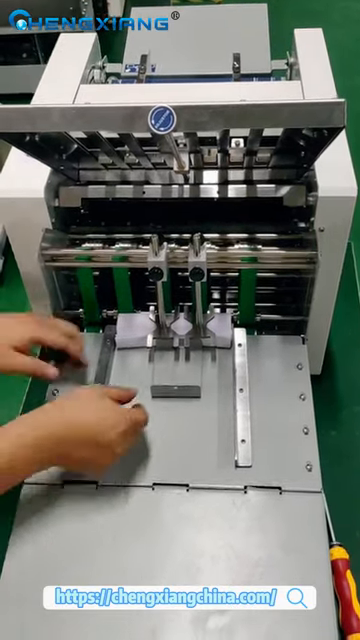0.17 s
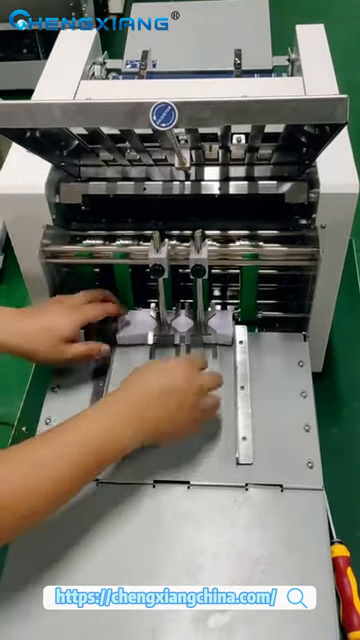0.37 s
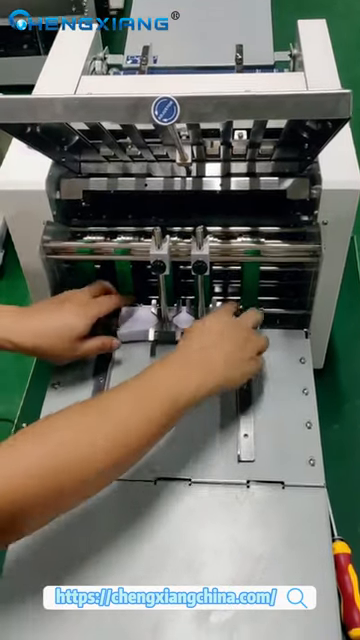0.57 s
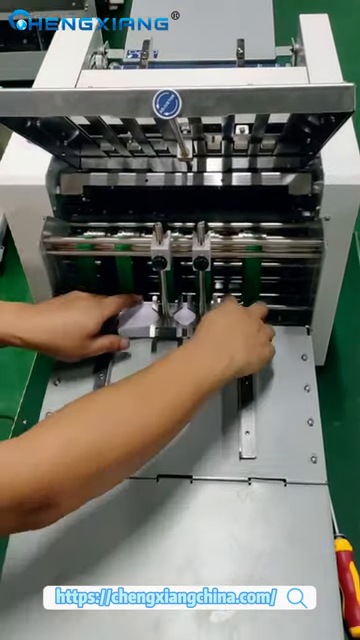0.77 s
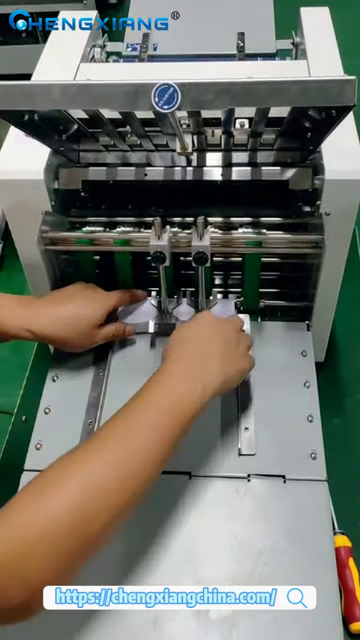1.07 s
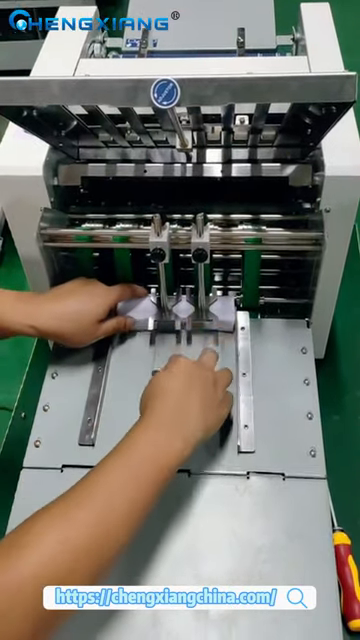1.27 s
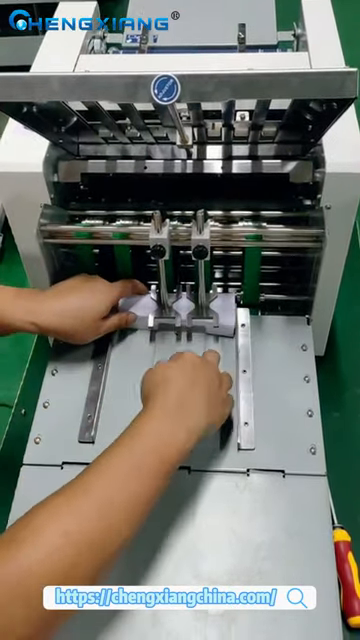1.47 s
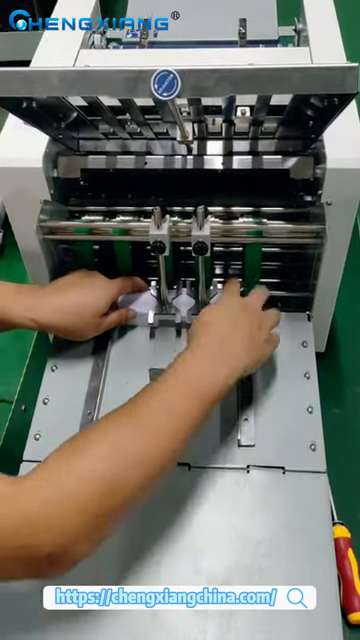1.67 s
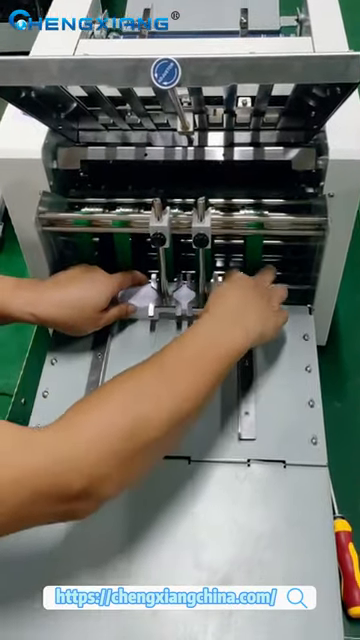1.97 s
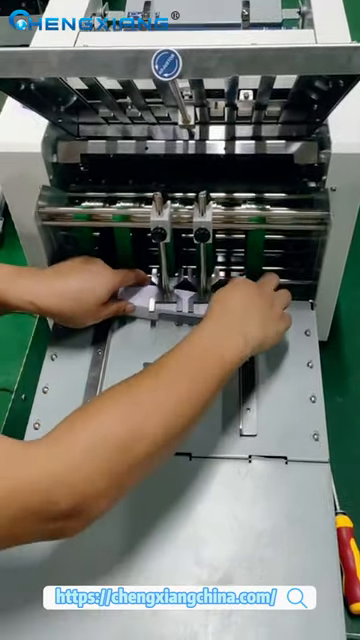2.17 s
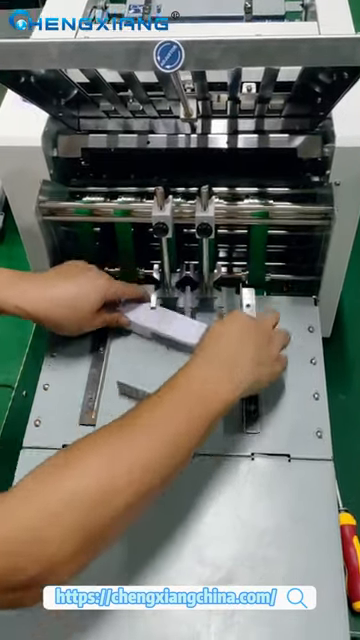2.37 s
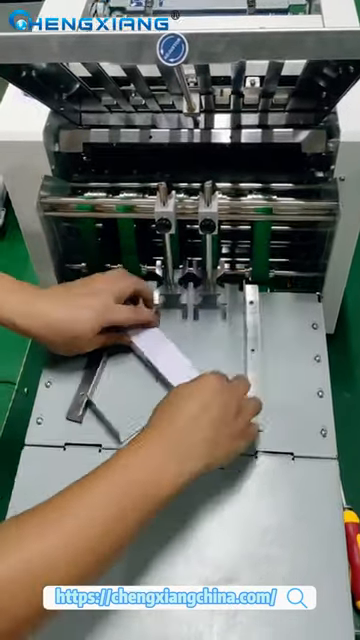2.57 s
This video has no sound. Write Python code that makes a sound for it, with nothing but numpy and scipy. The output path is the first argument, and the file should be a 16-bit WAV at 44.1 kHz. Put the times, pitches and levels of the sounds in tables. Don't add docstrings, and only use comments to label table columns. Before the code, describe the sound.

Close, practically mono pickup of a constant mains hum and faint hiss with slightly watery, gated treble; quiet paper rubs come late, followed by one bright metal snap with a short room tail.

```python
import sys
import numpy as np
from scipy import signal
from scipy.fft import rfft, irfft
from scipy.io import wavfile
from scipy.ndimage import uniform_filter1d

SR = 44100
rng = np.random.default_rng(int(sys.argv[2]) if len(sys.argv) > 2 else 0)


def gain_from_db(level_db):
    decades = np.asarray(level_db, float) / 20
    return 10 ** decades


def transcribe(u):
    v = np.clip(np.atleast_2d(u).T, -1, 1)
    q = np.round(v * 32767).astype(np.int16)
    wavfile.write(sys.argv[1], SR, q)


N = 119070


def unit(x):
    return x / np.sqrt(np.mean(x ** 2))


def noise():
    return rng.standard_normal(N)


def band(x, hz, width):
    return signal.lfilter(*signal.iirpeak(min(hz, .45 * SR), hz / width, fs=SR), x)


def butter(x, order, hz, kind):
    return signal.sosfilt(signal.butter(order, hz, kind, fs=SR, output="sos"), x)


def walk(rate):
    hold = int(SR / rate)
    steps = np.repeat(rng.standard_normal(N // hold + 1), hold)
    return 1.65 * uniform_filter1d(uniform_filter1d(steps, hold), hold)[:N]


# multiple of the buzz pitch, level in dB rms.
BUZZ_PARTIALS = [(1, -71), (2, -60), (3, -42.8), (4, -50), (5, -51.5), (6, -68), (7, -58), (10, -71),
                 (11, -77), (17, -78), (18, -80)]


def mains_buzz(t):
    buzz_hz, spread_rad, wobble_db = 100.06, 1.3, .6
    out = 0
    for multiple, db in BUZZ_PARTIALS:
        level = np.sqrt(2) * gain_from_db(db + wobble_db * walk(2.7))
        phase = spread_rad * multiple ** 2 + 0.3 * walk(4.83)
        out = out - level * np.cos(2 * np.pi * multiple * buzz_hz * t + phase)
    return out


# pitch in Hz, width in Hz, level in dB.
BOOMS = [(147.6, 8.1, -62.5), (170.7, 26, -77.5), (186.4, 9.1, -63), (210.5, 10.5, -51.5), (248, 6.9, -59),
         (282.4, 40, -61.5), (316, 10.3, -57.5), (414.5, 36, -61.5), (713.3, 28, -67), (1024, 56, -70),
         (1108, 19, -74.5), (1686, 105, -71), (2038, 140, -69)]


def room_boom():
    out = 0
    for hz, width, db in BOOMS:
        once = band(noise(), hz, 1.5 * width)
        out = out + gain_from_db(db) * unit(band(once, hz, 1.5 * width))
    return out


def coloured(shape):
    swell_db, flicker_db, third_octave = .5, .8, np.log(2) / 3
    log_hz = np.log(np.maximum(np.fft.rfftfreq(N, 1 / SR), 1))
    hz, db = np.array(shape).T
    spectrum = rfft(noise()) * gain_from_db(np.interp(log_hz, np.log(hz), db, right=-80))
    out, swell = 0, walk(4)
    for centre in np.arange(np.log(20), np.log(16000), third_octave):
        share = np.clip(1 - abs(log_hz - centre) / third_octave, 0, 1)
        part = irfft(spectrum * share, N)
        out = out + part * gain_from_db(swell_db * swell + flicker_db * walk(10))
    return unit(out)


# pitch in Hz, level in dB per Hz.
RUMBLE_COLOUR = [(25, -8), (70, -19), (120, -8.5), (200, 0.5), (330, -4), (600, -6.5), (1200, -12.5),
                 (3200, -18.5)]


def fan_rumble():
    return gain_from_db(-54) * coloured(RUMBLE_COLOUR)


# pitch in Hz, level in dB per Hz.
HISS_COLOUR = [(2500, -34.5), (3400, -4.5), (4000, -3), (5500, -1.5), (7000, -2), (9000, -3), (11500, -8),
               (15000, -14.5)]
# time in seconds, level in dB.
HISS_LEVELS = [(0, -54), (.8, -54.5), (.92, -55), (.99, -55.5), (1.1, -54), (1.45, -54.5), (1.55, -56),
               (1.77, -56), (1.9, -54.5), (2.07, -53.5), (2.1, -57.5), (2.23, -57.5), (2.37, -54.5),
               (2.5, -53.5), (2.6, -52), (2.7, -57)]


def air_hiss(t):
    return coloured(HISS_COLOUR) * gain_from_db(np.interp(t, *np.array(HISS_LEVELS).T))


# start in seconds, length in seconds, hiss in dB, scrape in dB, scrape pitch in Hz.
PAPER_SLIDES = [
    (1.985, .085, -49.5, -72, 4500),
    (2.0, .04, -72, -54.5, 1370),
    (1.98, .065, -72, -58, 2400),
    (2.3, .23, -61, -66, 1100),
    (.97, .05, -61, -72, 2000),
]


def paper(t):
    hiss_hz, hiss_width, grain_db = 7200, 5500, 3
    out = 0
    for start, length, hiss_db, scrape_db, hz in PAPER_SLIDES:
        corners = start + length * np.array([0, .46, .86, 1])
        env = np.interp(t, corners, [0.0092, 1, 0.97, 0.05])
        grains = gain_from_db(grain_db * rng.exponential(size=N))
        rub = noise() * grains * gain_from_db(0.51 * walk(150))
        bright = unit(band(band(rub, hiss_hz, hiss_width), hiss_hz, 2 * hiss_width))
        scrape = unit(band(band(rub, hz, 0.23 * hz), hz, .5 * hz))
        out = out + env * (gain_from_db(hiss_db) * bright + gain_from_db(scrape_db) * scrape)
    return out


def ring(x, modes):
    out = 0
    for hz, db, t60 in modes:
        pole = np.exp(2j * np.pi * hz / SR - np.log(1000) / (t60 * SR))
        out = out + gain_from_db(db) * signal.lfilter([1], [1, -pole], x).imag
    return out


# time in seconds, level in dB.
BAR_HITS = [
    (2.5369, -30),
    (2.5373, -25.5),
    (2.5379, -25),
    (2.539, -26.5),
    (2.5401, -34),
    (2.5465, -40),
    (2.5492, -39),
]
# pitch in Hz, level in dB, time to fade by 60 dB in seconds.
BAR_MODES = [(3460, -19, 0.0095), (4240, -18, .008), (4590, -2.5, 0.0077), (5100, -4, 0.0069),
             (6010, 2.5, 0.015), (6420, 0, 0.013), (7270, -14, .012), (7997, -4.5, 0.013),
             (8920, -2, 0.015), (9600, -11, 0.011), (10900, -13, 0.013), (11400, -20, 0.0098)]


def steel_bar():
    hits = np.zeros(N)
    for s, db in BAR_HITS:
        hits[int(s * SR)] += gain_from_db(db) / 2
    return butter(ring(hits, BAR_MODES), 2, [3030, 11500], "band")


# pitch in Hz, level in dB, time to fade by 60 dB in seconds.
TABLE_MODES = [(330, 3, 0.054), (490, -5.5, 0.054), (846, -11, 0.037), (1055, -11.5, 0.083),
               (1326, -9.5, 0.055), (1585, -4, 0.086), (2050, -9, 0.061), (2252, -3.5, 0.056),
               (2420, -14, .04), (2940, -18, 0.036), (3500, -12, .03)]


def steel_table(t):
    push_at_s, push_s = 2.5398, .0001
    push = np.exp(-((t - push_at_s) / push_s) ** 2)
    table = band(ring(push, TABLE_MODES), 920, 2700)
    return gain_from_db(-26) * table / abs(table).max()


def room_tail(t):
    high_t60_s, low_t60_s = .13, .22
    after = np.maximum(t - BAR_HITS[1][0], 0)
    high = gain_from_db(-44 - 60 * after / high_t60_s) * unit(band(noise(), 4700, 7400))
    low = gain_from_db(-49 - 60 * after / low_t60_s) * unit(band(noise(), 1800, 2400))
    return (after > 0) * (high + low)


def scene():
    t = np.arange(N) / SR
    machine = mains_buzz(t) + room_boom() + fan_rumble() + air_hiss(t)
    snap = steel_bar() + steel_table(t) + room_tail(t)
    mono = machine + paper(t) + snap
    return np.array([mono, mono])


# pitch in Hz, limit in dB from the usual level; quieter bands are muted.
GATE_LIMITS = [(1500, -6), (2400, -3.6), (3200, -1.2), (3600, -1.6), (4500, -2.6), (6000, -3.6),
               (8500, -2.6), (11000, -1), (11900, -.8), (12150, 1.5), (12300, 9)]


def noise_gate(x):
    follow, ceiling = .7, 2.0
    padded = np.pad(x, (0, 4096), "reflect")
    f, _, z = signal.stft(padded, SR, nperseg=2048, noverlap=1536, boundary="even")
    power = uniform_filter1d(uniform_filter1d(abs(z) ** 2, size=6, axis=0), size=4, axis=1)
    usual = uniform_filter1d(np.median(power, axis=1), size=15)[:, None]
    around = uniform_filter1d(uniform_filter1d(power / usual, size=70, axis=0), size=7, axis=1)
    limit_db = np.interp(f, *np.array(GATE_LIMITS).T, left=-99)[:, None]
    limit = usual * np.minimum(around, ceiling) ** follow * gain_from_db(2 * limit_db)
    return signal.istft(z * (power > limit), SR, nperseg=2048, noverlap=1536)[1][:N]


# middle in seconds, lowest Hz, highest Hz.
SIDE_PUFFS = [(.12, 4200, 5700), (.26, 7600, 9000), (.35, 9000, 10400), (.47, 9000, 11100),
              (.68, 4200, 5200), (.89, 9000, 10400), (.96, 5700, 6900), (1.4, 4700, 5700),
              (1.98, 4200, 6900)]


def side_noise(t):
    puff_s = .046
    side = 0
    for s, low_hz, high_hz in SIDE_PUFFS:
        env = np.cos(np.pi * np.clip((t - s) / puff_s, -.5, .5))
        side = side + env * unit(butter(noise(), 6, [low_hz, high_hz], "band"))
    return gain_from_db(-66.5) * side * np.array([[1], [-1]])


def top_cut(x):
    return signal.sosfilt(signal.butter(12, 13200, fs=SR, output="sos"), x)


def record(dry):
    t = np.arange(N) / SR
    mono = noise_gate(butter(dry[0], 2, 67, "high"))
    mix = mono + side_noise(t)
    return top_cut(mix)


dry = scene()
out = record(dry)
transcribe(out)
```